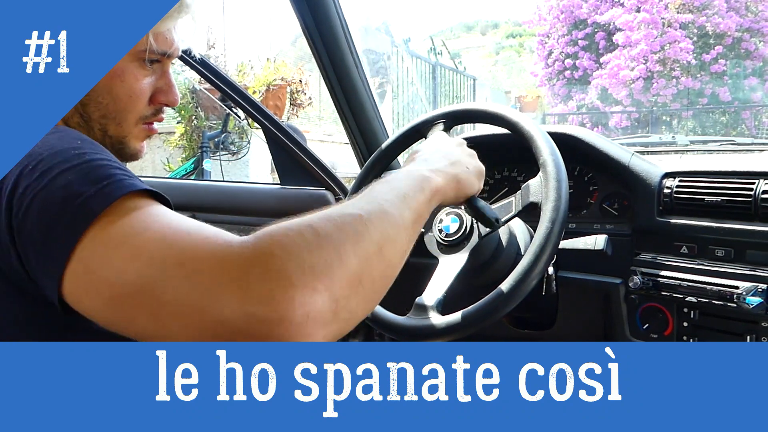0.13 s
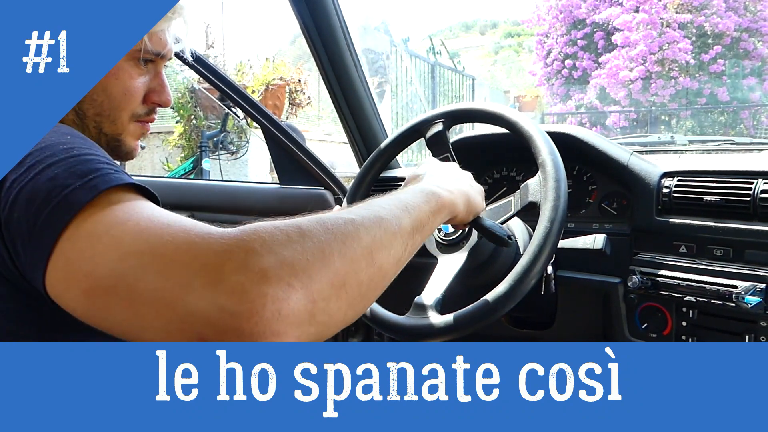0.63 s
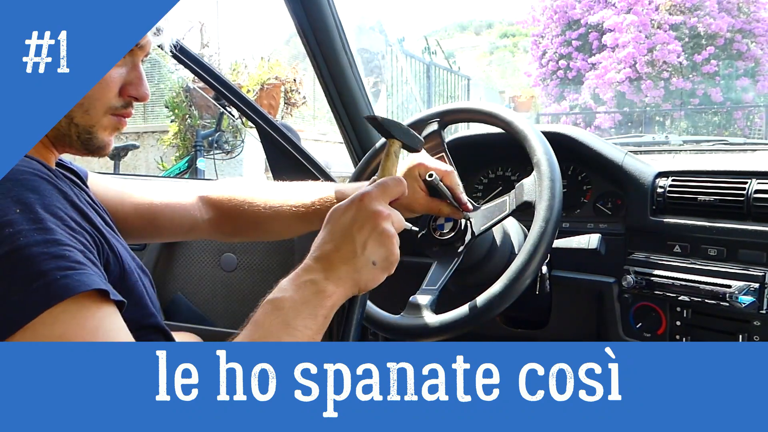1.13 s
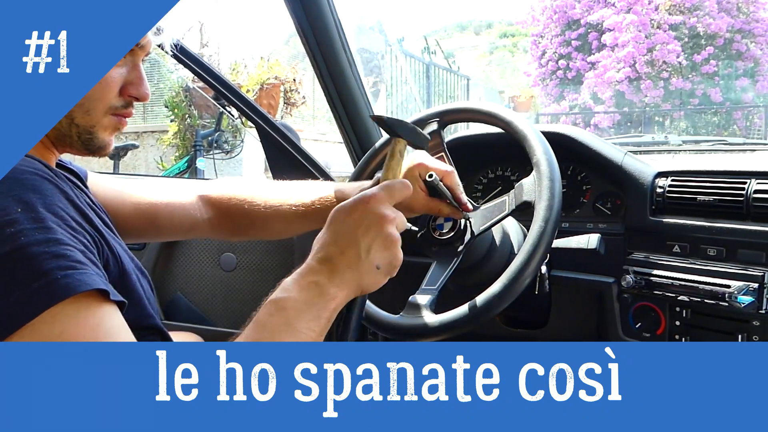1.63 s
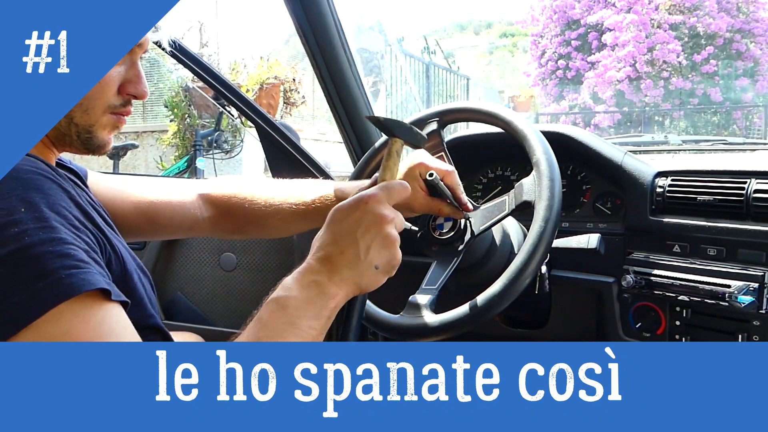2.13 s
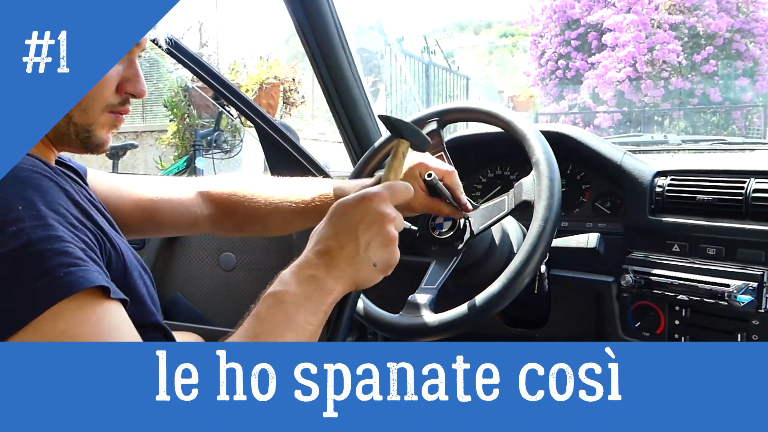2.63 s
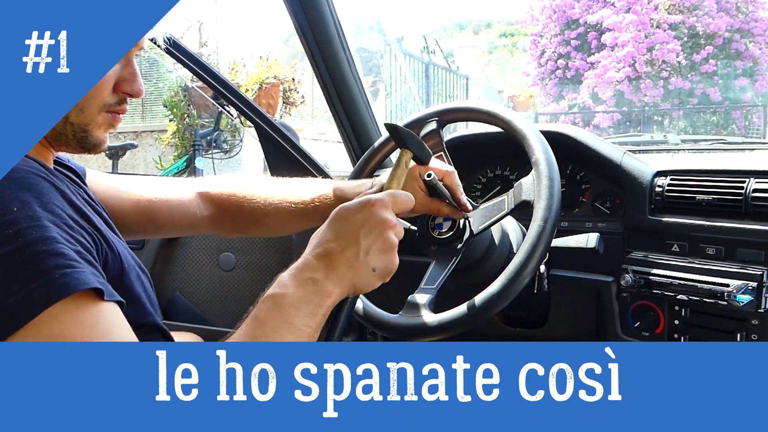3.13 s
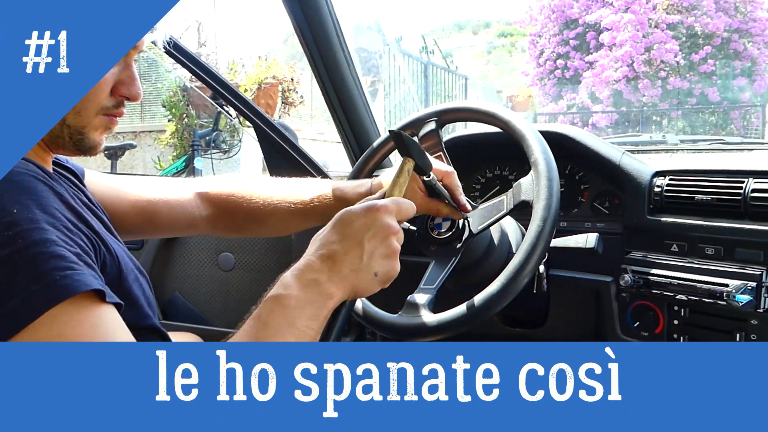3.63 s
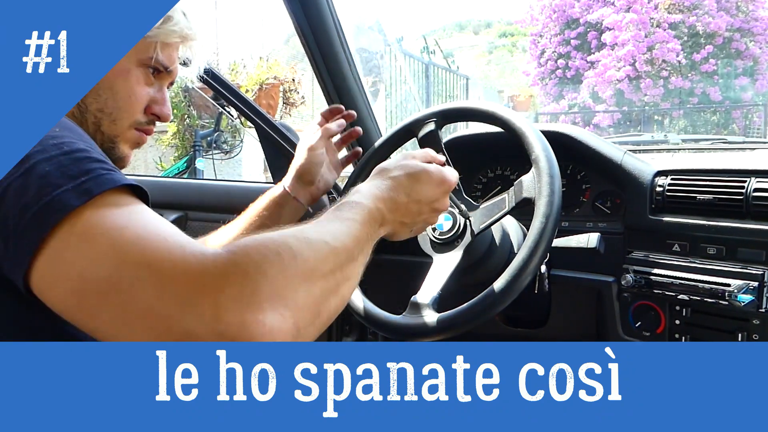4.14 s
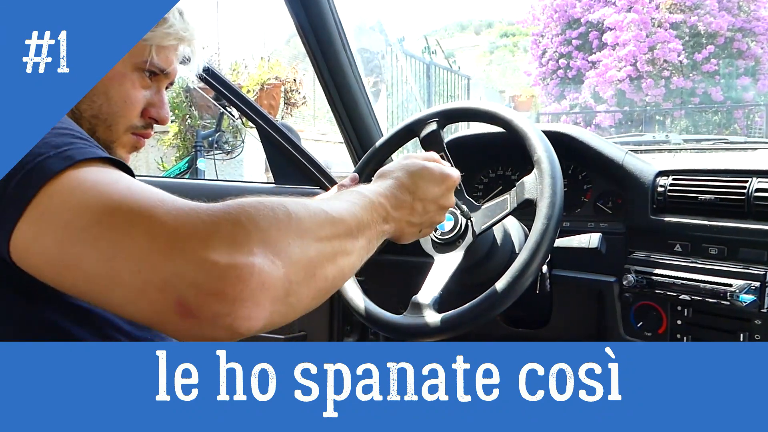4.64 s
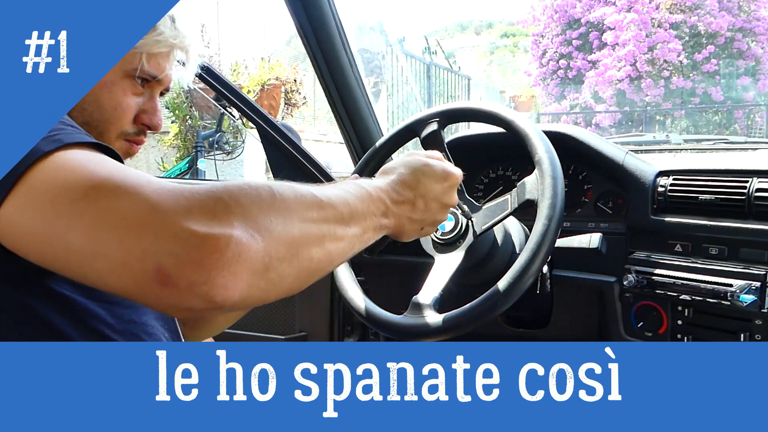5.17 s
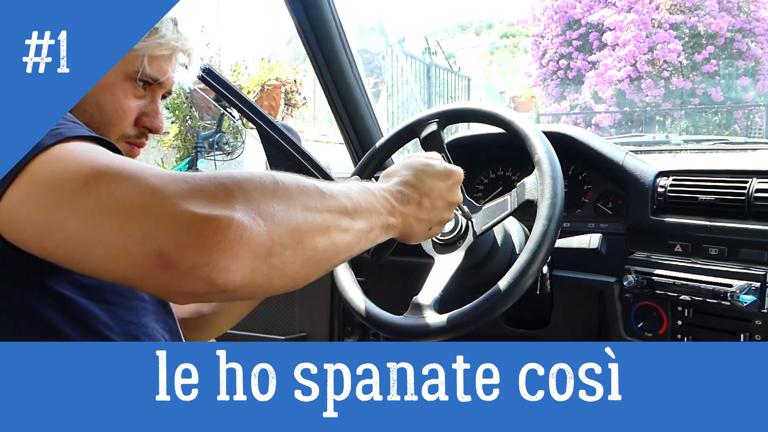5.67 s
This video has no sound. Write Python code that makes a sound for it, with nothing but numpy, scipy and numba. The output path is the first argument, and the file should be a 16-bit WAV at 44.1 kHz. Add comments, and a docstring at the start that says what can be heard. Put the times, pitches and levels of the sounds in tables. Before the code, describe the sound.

Inside a parked car with an open door, small tool taps and a faint clink sit over raised airy hiss. Then a hammer drives a steel bit into a steering-wheel hub: thirteen hard, regular metallic cracks with short cabin echoes. A split-second silence follows, then soft knocks and rubbing. Close stereo microphone.

```python
"""Inside a parked car with its door open, a steel bit taps its way into a bolt on the steering-wheel hub.
From 0.9 s thirteen hammer blows drive it: cabin echoes crack, hub, wheel and hammer head ring as decaying tones.
After a brief silence at 4.1 s, someone leans on the tool: softer touches and rubbing, made of shaped noise.
Filtered noise for quiet air and hiss lies under all three sections, each set at its own gain."""
import sys
import numpy as np
from scipy import signal
from scipy.fft import rfft, irfft
from scipy.io import wavfile
from numba import njit

SR = 44100
rng = np.random.default_rng(int(sys.argv[2]) if len(sys.argv) > 2 else 0)


def materialize(psi):
    """Save the field psi as 16-bit PCM at rate SR to the path in sys.argv[1].

    A 1-D psi becomes a single channel; in a 2-D psi each row is a channel.
    """
    bounded = np.clip(np.atleast_2d(psi).T, -1, 1)
    quanta = np.round(bounded * 32767).astype(np.int16)
    wavfile.write(sys.argv[1], SR, quanta)


def volts(x):
    """Linear amplitude factor 10**(x/20) for a level x in dB, scalar or array-like."""
    e = np.asarray(x, float) / 20
    return 10 ** e


N = 255054
HIT_LEN = 12288  # samples in each burst of echoes or ringing tone

# Hammer blows: (time [s], crack level [dB], hub level re crack [dB], hammer ring level [dB],
# spot on the hammer face [0-1])
BLOWS = [(0.92, 0, -10, -13.5, 0.28), (1.1357, 2, -4.5, -4, 0.86), (1.383, 3.5, -1.5, 4, .35),
         (1.6385, 3, 1.5, 2, 0.35), (1.8962, 2.5, 1, -2, 0.3), (2.1436, 2.5, 0.5, -2.5, .708),
         (2.3965, 3, 1.5, 4, 0.78), (2.6517, 2, 1.5, 1.5, 0.95), (2.9086, 2.5, 1.5, 0, .675),
         (3.161, 2.5, 0.5, -1, 0.98), (3.4213, 1, 2.5, -0.5, 0.47), (3.6843, 1, 3.5, -1, 0.21),
         (3.9647, 2.5, 0, 0, .808)]
# Dense cabin echoes of a contact: (frequency [Hz], relative level per Hz [dB])
CRACK_SPECTRUM = [(35, -49), (100, -28.5), (500, -12.5), (950, -17.5), (1300, -10.5), (1800, -17),
                  (2600, -14), (3300, -12), (4800, -6.5), (7700, -11), (8840, -5), (11200, -8),
                  (14800, -7.5), (16300, -27.5)]
# How fast the echoes die: (frequency [Hz], time to fall 60 dB [s])
CRACK_T60 = [(60, 0.1), (200, 0.062), (500, 0.12), (1200, 0.12), (3000, 0.088), (8000, 0.073),
             (16000, 0.032)]
# Faint tail from the yard outside: (frequency [Hz], level re crack [dB])
YARD_TAIL = [(60, 2), (200, -11), (600, -28), (2000, -41), (6000, -39.5), (16000, -67.5)]
# Short rings of hub and bit: (frequency [Hz], level [dB], time to fall 60 dB [s])
HUB_RINGS = [(1253, -52.5, 0.42), (1230, -11.5, 0.028), (1303, -54.5, 0.4), (4000, -44, .3),
             (2040, -29, 0.1), (2485, -29.5, 0.083), (3908, -15, 0.055), (4600, -22, .04), (5450, -16, .04),
             (5030, -4.5, 0.015), (5820, -14.5, 0.05), (6896, -0.5, 0.01), (8510, -4.5, 0.017),
             (7320, -16, .04)]
# Wheel and column: (frequency [Hz], level [dB], time to fall 60 dB [s], left minus right [dB])
WHEEL_RINGS = [(75, -40.5, 0.53, -7.5), (105, -45, 1, -10), (124, -30, 0.17, 0), (174.6, -25, 0.12, -6.5),
               (210.3, -36, 0.47, -7), (260.3, -31, 0.22, -3.5), (292.2, -34.5, .2, -0.5),
               (356, -29.5, 0.13, -7), (455.2, -22, 0.1, 0.5), (522.8, -15.5, 0.071, -4),
               (569.6, -25.5, 0.13, 6), (685, -36, 0.086, -1.5)]
# The wheel slaps back on its column: (nominal delay [s], level [dB])
REBOUNDS = [(0, 2.5), (.018, -3.5), (.042, -16)]
# Rings of the hammer head: (frequency [Hz], time to fall 60 dB [s])
HAMMER_RINGS = [(3934, .25), (6590, .62), (9148, .7), (11770, .85), (14610, .9)]
# The k-th ring lays k half waves across the face: (level near a crest [dB],
# place of a crest [on the scale of spot; may lie just off the face])
HAMMER_FACE = [(-31, .012), (-24.5, .119), (-50, -.004), (-49.5, -.048), (-49.5, .033)]
# The tool touching the hub: (time [s], crack level [dB], centre [Hz], rise time constant [ms],
# rim level [dB])
TAPS = [(.109, -7, 2400, 5, -14), (.1245, -9.5, 2780, 1.4, -11), (0.1289, -19, 3450, 0.68, -9),
        (.243, -37, 400, 5, -22.5), (0.342, -24.5, 1800, 1.1, -25.5), (0.351, -52, 1150, 3, -22.5),
        (.707, -26, 1273, 2, -31.5), (4.503, -14.5, 850, 1.1, -14.5), (4.537, -24, 900, 3, -19.5),
        (4.672, -18, 1293, 3.2, -26.5), (4.695, -30, 1212, 1.5, -36), (4.8, -9, 298, 3.5, -36),
        (5.033, -19.5, 850, 1.7, -25)]
# Sleeve and palm rubbing, and a low push on the rim: (start [s], rise [s], fall time constant [s],
# level before grain [dB], centre [Hz])
RUSTLES = [(0.099, 0.011, 0.019, -35, 1730), (2.964, 0.01, 0.023, -44, 12500),
           (4.099, 0.031, 0.12, -47, 10850), (4.441, .04, 0.018, -47, 5460), (4.5, 0.037, .07, -44.5, 95)]
# Middle of the air bed: (frequency [Hz], relative level per Hz [dB])
AIR_SPECTRUM = [(15, -53.5), (25, -19.5), (74, -2), (213, 0.5), (287, -0.5), (549, -0.5), (664, -4.5),
                (825, -3.5), (1140, -3), (3470, -14), (9990, -14), (15000, -20.5), (16300, -25.5)]
# Width of the air bed: (frequency [Hz], side minus mid [dB])
AIR_WIDTH = [(60, -2.5), (110, 7.5), (200, 7.5), (380, 6.5), (700, 3), (1290, 0), (2380, -2), (4400, -5),
             (8120, -6.5), (15000, -2)]
# The air settles in the last section: (time [s], level [dB])
AIR_FADE = [(4.3, -2.5), (5.78, -6)]
# Sections: (start [s], end [s], gain of the whole mix [dB], air level before that gain [dB],
# air left minus right [dB])
SECTIONS = [(0, .824, 14.5, -1.5, 0), (.824, 4.102, 0, -2.5, 0), (4.114, 6, -1, 2.5, 2)]

# Crack
SAME_SHARE = 0.6  # share of echo power that every blow repeats
TILT_DB_PER_OCTAVE = -1.5
BUILD_CYCLES = 0.51  # build-up time constant of each octave, in cycles, so the bass comes late
YARD_T60_S = 1
SIDE_DB = -11  # side level re mid
HUB_SCATTER_DB = 2.5  # no two blows ring the hub alike
# A loose bit shakes the rim more and dulls the crack until the first blows seat it
RIM_DB, LOOSE_RIM_DB = 2.5, 8.5
LOOSE_TILT_DB_PER_OCTAVE, SEATING_S = -1, 0.15  # SEATING_S is a time constant

# Wheel and hammer head
RIM_FROM_HZ = 400  # rings above this belong to the rim, the rest to the column
DETUNE = 0.015  # random spread of the column's ring pitches at each slap, so the low tail blends
NODE_DB = -12  # what is left of a hammer ring struck on its node

# Lighter contacts and air
TAP_T60_S = 0.26  # the hand on the tool damps a tap
CLINK_S, CLINK_DB = 0.12, -43  # level at 4 kHz
RUSTLE_OCTAVES = 1.5  # distance from the centre at which a rustle is 6 dB down
AIR_DB = -49.5


def blows():
    """Each blow cracks, shakes the wheel and rings the hammer; most echoes repeat since nothing moves."""
    out = np.zeros((2, N))
    hub = modes(HUB_RINGS, 0.00013)
    head = hammer_tones()
    usual = cabin_echoes()
    for s, db, hub_db, ring_db, spot in BLOWS:
        echoes = np.sqrt(SAME_SHARE) * usual + np.sqrt(1 - SAME_SHARE) * cabin_echoes()
        loose = np.exp(-(s - BLOWS[0][0]) / SEATING_S)
        rim_db = RIM_DB + LOOSE_RIM_DB * loose
        tilt_db = TILT_DB_PER_OCTAVE + LOOSE_TILT_DB_PER_OCTAVE * loose

        def tilt(hz):
            return tilt_db * np.log2(hz / 3000)

        add(out, volts(db) * crack(echoes, hub, tilt, 0.15, hub_db), s)
        add(out, wheel(rim_db, 0, REBOUNDS), s)
        add(out, hammer(head, ring_db + face_db(spot)), s)
    out[:, int(SECTIONS[1][1] * SR):] = 0  # the last blow stops with its section
    return out


def cabin_echoes():
    """A fresh random pattern of dense reflections, one row for mid and one for side."""
    return volts(-8) * coloured(lambda hz: on_log(CRACK_SPECTRUM, hz), HIT_LEN, count=2)


def crack(echoes, hub, colour, rise_ms, hub_db):
    """Cabin echoes of a contact, each octave dying at its own rate, plus the hub's short rings."""
    t, hz = np.arange(HIT_LEN) / SR, np.fft.rfftfreq(HIT_LEN, 1 / SR)
    octave = np.log2(np.maximum(hz, 1) / 1000)
    spectrum = rfft(echoes) * volts(colour(np.maximum(hz, 1)))
    yard = fade(t, YARD_T60_S)
    # the direct sound and the nearest glass come first and hardest
    direct = 1 + 2.1 * np.exp(-t / 0.0017)
    out = np.zeros((2, HIT_LEN))
    for centre in np.arange(-5, 5):  # overlapping octave bands around 1 kHz
        band = irfft(spectrum * np.maximum(1 - abs(octave - centre), 0), HIT_LEN)
        centre_hz = 1000 * 2. ** centre
        build = 1 - np.exp(-t * centre_hz / BUILD_CYCLES)
        cabin = direct * fade(t, on_log(CRACK_T60, centre_hz))
        out += band * build * (cabin + volts(on_log(YARD_TAIL, centre_hz)) * yard)
    hub_hz = np.transpose(HUB_RINGS)[0]
    strength, turn = rng.standard_normal((2, len(hub_hz)))
    db = hub_db + HUB_SCATTER_DB * strength + colour(hub_hz)
    phase = np.arange(len(hub_hz))
    out[0] += ring(hub, db, phase + 0.13 * turn)
    # low hub rings reach the two ports less alike than high ones
    side_db = db - 3.7 * np.log2(hub_hz / 2000)
    out[1] += ring(hub, side_db, phase + 0.4 * turn + np.pi / 2)
    return stereo(out[0], volts(SIDE_DB) * out[1]) * (1 - np.exp(-t * 1000 / rise_ms))


def wheel(rim_db, column_db, slaps):
    """The shake swells late in rim and column, and comes back in weaker slaps."""
    out = np.zeros((2, 2 * HIT_LEN))
    rings = np.array(WHEEL_RINGS)
    hz, _, _, pan_db = rings.T
    ports = np.array([[1], [-1]])  # left, right
    part_db = np.where(hz > RIM_FROM_HZ, rim_db, column_db)
    for delay, slap_db in slaps:
        strength, turn, late = rng.standard_normal((3, len(rings)))
        spread = rings.copy()
        spread[:, 0] *= 1 + DETUNE * late * (hz < RIM_FROM_HZ)
        db = slap_db + 1.1 * strength + part_db + ports * pan_db / 2
        # the left leads by a fixed phase, which is most time in the bass
        phase = np.arange(len(rings)) + 0.6 * turn + 0.16 * ports
        # slap delays wander a little
        add(out, ring(modes(spread, 0.0079), db, phase), delay * (1 + 0.082 * late[0]))
    return out


def hammer_tones():
    """The free rings of the hammer head, at equal level."""
    return modes([(hz, 0, t60) for hz, t60 in HAMMER_RINGS], 0.0026)


def hammer(tones, db):
    """Clear rings of the hammer head in random phase, slightly right of centre."""
    mono = ring(tones, db, 2 * np.pi * rng.random(len(HAMMER_RINGS)))
    return stereo(mono, -0.06 * mono)


def face_db(spot):
    """Level of each hammer ring for a blow at spot: strong on a crest of its wave, weak on a node."""
    db, crest = np.transpose(HAMMER_FACE)
    wave = np.cos(np.pi * np.arange(1, len(db) + 1) * (spot - crest))
    return db + 20 * np.log10(np.hypot(wave, volts(NODE_DB)))


def taps():
    """The tool touches the hub: a hand-damped crack around one pitch, each with its own echoes."""
    out = np.zeros((2, N))
    hub = modes(HUB_RINGS, 0.00013)
    damped = fade(np.arange(HIT_LEN) / SR, TAP_T60_S)
    for s, db, centre_hz, rise_ms, rim_db in TAPS:

        def bell(hz):
            return -5 * np.log2(hz / centre_hz) ** 2

        add(out, volts(db) * crack(cabin_echoes(), hub, bell, rise_ms, hub_db=-8) * damped, s)
        # a light touch rings the rim but hardly moves the column, so nothing slaps back
        add(out, wheel(rim_db, rim_db - 5, REBOUNDS[:1]), s)
    return out


def clink():
    """The hammer head brushes the bit once and rings faintly, its higher rings weaker."""
    out = np.zeros((2, N))
    db = CLINK_DB - 14 * np.log2(np.transpose(HAMMER_RINGS)[0] / 4000)
    add(out, hammer(hammer_tones(), db), CLINK_S)
    return out


def rustles():
    """Cloth and skin catch and slip: noise with a random stepped grain, swelling and fading."""
    out, t = np.zeros((2, N)), np.arange(HIT_LEN) / SR
    for s, rise, fall, db, centre_hz in RUSTLES:

        def bell(hz):
            return -6 * (np.log2(np.maximum(hz, 1) / centre_hz) / RUSTLE_OCTAVES) ** 2

        mid, side = coloured(bell, HIT_LEN, count=2)
        grain_db = np.zeros(HIT_LEN)
        for hold in (64, 512):  # samples per step
            grain_db += 3 * np.repeat(rng.standard_normal(HIT_LEN // hold), hold)
        swell = np.minimum(t / rise, 1) * np.exp(-np.maximum(t - rise, 0) / fall)
        add(out, volts(db) * swell * volts(grain_db) * stereo(mid, 0.5 * side), s)
    return out


def air():
    """Distant murk and hiss as filtered noise; the bass is wider than most of the treble."""
    mid, other = coloured(lambda hz: on_log(AIR_SPECTRUM, hz), N, count=2)
    side = irfft(rfft(other) * volts(on_log(AIR_WIDTH, np.fft.rfftfreq(N, 1 / SR))), N)
    t = np.arange(N) / SR
    db = AIR_DB + np.interp(t, *np.transpose(AIR_FADE))
    for start, end, _, air_db, pan_db in SECTIONS:
        ports_db = air_db + np.array([[pan_db], [-pan_db]]) / 2
        db = db + ports_db * (t >= start) * (t < end)
    return volts(db) * stereo(mid, side)


def modes(table, rise_s):
    """Each (Hz, dB, t60) row as a decaying complex tone that swells with time constant rise_s."""
    t = np.arange(HIT_LEN) / SR
    hz, db, t60 = np.transpose(table)[:3, :, None]
    return volts(db) * (1 - np.exp(-t / rise_s)) * fade(t, t60) * np.exp(2j * np.pi * hz * t)


def ring(tones, db, phase):
    """Sum the tones, each with its own strength and phase."""
    return ((volts(db) * np.exp(1j * phase)) @ tones).imag


def coloured(db_of_hz, size, count):
    """Noise rows whose spectrum follows a dB function, scaled to a joint rms of 1."""
    spectrum = rfft(rng.standard_normal((count, size)))
    x = irfft(spectrum * volts(db_of_hz(np.fft.rfftfreq(size, 1 / SR))), size)
    return x / x.std()


def on_log(table, hz):
    """Read a (Hz, value) table on a log-frequency axis."""
    f, v = np.transpose(table)
    return np.interp(np.log(np.maximum(hz, 1)), np.log(f), v)


def fade(t, t60):
    """Exponential decay of 60 dB in t60 seconds."""
    return np.exp(-np.log(1000) * t / t60)


def add(out, sound, s):
    """Mix a sound in at s seconds."""
    i = int(s * SR)
    out[:, i:i + sound.shape[1]] += sound[:, :out.shape[1] - i]


def stereo(mid, side):
    """Left and right from mid and side."""
    return np.array([mid + side, mid - side])


def scene():
    """Blows, taps, a clink and rubbing over the air."""
    return blows() + taps() + clink() + rustles() + air()


@njit
def follow(x, release):
    """Peak level that jumps up at once and sinks slowly."""
    e, out = 1e-9, np.empty(len(x))
    for i in range(len(x)):
        e = max(x[i], e * release)
        out[i] = e
    return out


def roll_off(x):
    """The treble ends steeply here."""
    return signal.sosfilt(signal.butter(12, 16420, fs=SR, output="sos"), x)


def record(dry):
    """An expander opens on loud sound and sinks after it; each section gets its gain; peaks clip."""
    level_db = 20 * np.log10(follow(np.abs(dry).max(axis=0), volts(-160 / SR)))  # release 160 dB/s
    openness = np.clip((level_db + 33.5) / 22, 0, 1)
    wet = dry * volts(3.9 * (openness - 1))  # quiet sound is 3.9 dB down
    t = np.arange(N) / SR
    # the gain is zero in the short gap before the last section
    gain = sum(volts(db) * (t >= start) * (t < end) for start, end, db, *_ in SECTIONS)
    return roll_off(np.clip(wet * gain, -1, 1))


dry = scene()
out = record(dry)
materialize(out)
```